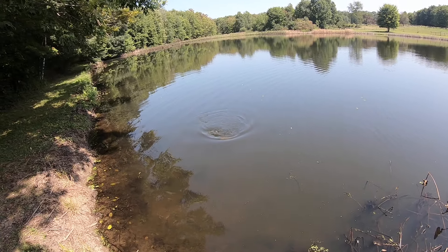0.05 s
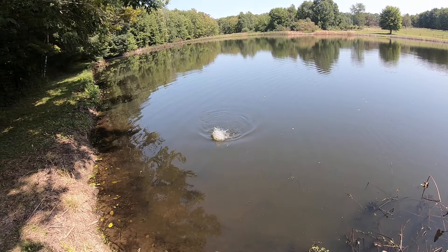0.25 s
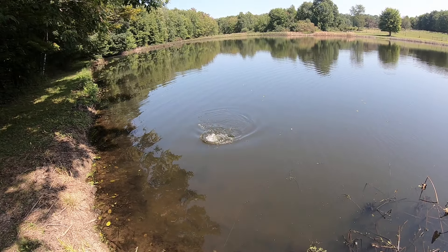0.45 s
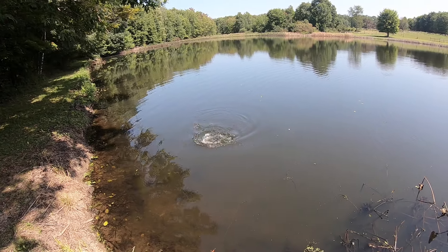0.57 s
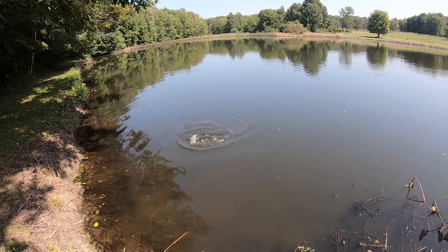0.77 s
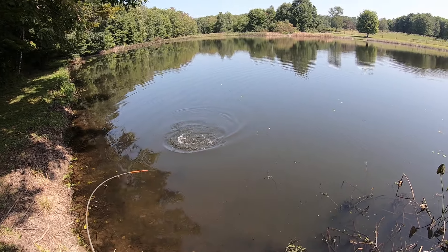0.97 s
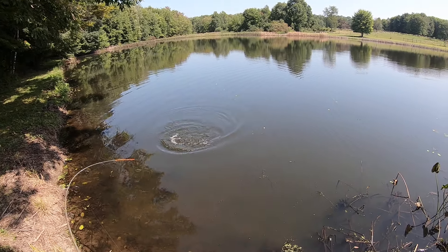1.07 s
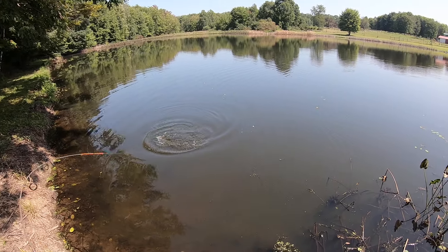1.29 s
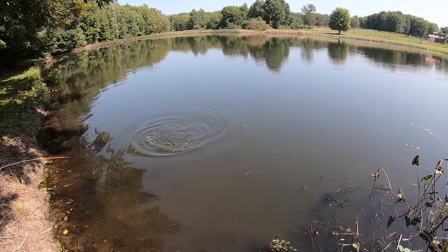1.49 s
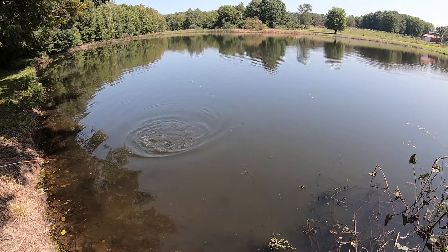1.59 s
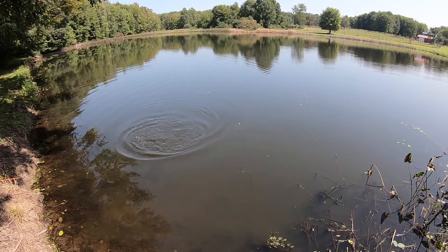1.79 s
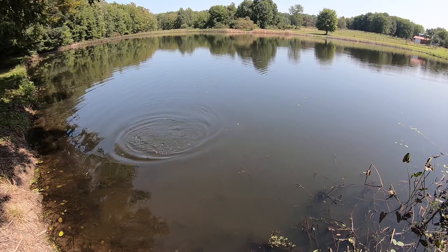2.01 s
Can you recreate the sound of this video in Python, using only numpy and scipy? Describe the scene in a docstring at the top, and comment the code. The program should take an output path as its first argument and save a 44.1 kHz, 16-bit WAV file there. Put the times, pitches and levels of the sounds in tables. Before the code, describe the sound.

A small gulping fish splash on calm water, followed by a thin, high insect buzz.

```python
"""Fish swirl on a calm pond.

A tail slap throws spray, trapped air rings in deep gulps, then drops and bubbles fall back.
A meadow katydid on the right scrapes its wings: ticks, then a buzz. A fishing reel whirrs briefly
and the tackle knocks twice. Far insects, light wind and a low outdoor hum lie under it, nearly mono."""
import sys
import numpy as np
from scipy import signal
from scipy.fft import rfft, irfft, next_fast_len
from scipy.io import wavfile
from scipy.ndimage import map_coordinates

SR = 44100
rng = np.random.default_rng(int(sys.argv[2]) if len(sys.argv) > 2 else 0)


def digitize_waveform(pressure):
    """Quantize a signal to 16-bit integers and store it at the path in sys.argv[1].

    Rows of a 2-D input are taken as channels; values are limited to [-1, 1].
    """
    field = np.atleast_2d(pressure).T
    bounded = np.clip(field, -1, 1)
    quanta = np.round(bounded * 32767).astype(np.int16)
    wavfile.write(sys.argv[1], SR, quanta)


N = 90404


def amp(db):
    """Decibels to gain."""
    return 10 ** (np.asarray(db) / 20)


def unit(x):
    """Scale to rms 1."""
    return x / np.sqrt(np.mean(x ** 2) + 1e-20)


def clock():
    """Sample times in seconds."""
    return np.arange(N) / SR


def level(rows):
    """Gain per sample from (s, dB) points."""
    return amp(np.interp(clock(), *np.transpose(rows)))


def bump(centre_s, width_s):
    """Gaussian envelope, peak 1."""
    return np.exp(-((clock() - centre_s) / width_s) ** 2)


def wobble(rate_hz):
    """Smooth random curve, rate_hz knots a second."""
    return map_coordinates(rng.standard_normal(size=4096), [clock() * rate_hz], mode="wrap")


def noise():
    """White noise."""
    return rng.standard_normal(N)


def filtered(x, response):
    """Apply a gain given as a function of Hz."""
    size = next_fast_len(N + 8192)
    return irfft(rfft(x, size) * response(np.fft.rfftfreq(size, 1 / SR)), size)[..., :N]


def coloured(x, points):
    """Shape x by (Hz, dB) points, then scale to rms 1."""
    knots_hz, db = np.transpose(points)
    return unit(filtered(x, lambda hz: amp(np.interp(np.log(hz + 1), np.log(knots_hz), db))))


def whistle(hz, wander_hz, rate_hz):
    """Tone of unsteady pitch, rms 1."""
    return unit(np.sin(2 * np.pi * np.cumsum(hz + wander_hz * wobble(rate_hz)) / SR))


def bubble(start_s, hz, swell_s, decay_s, glide_oct_per_s):
    """An air pocket swells and rings down; its pitch glides for the first 30 ms."""
    t = np.clip(clock() - start_s, 0, .15)
    swell = np.sin(np.pi / 2 * np.minimum(t / swell_s, 1)) ** 2
    decay = np.exp(-np.maximum(t - swell_s, 0) / decay_s)
    pitch_hz = hz * 2 ** (glide_oct_per_s * np.minimum(t, .03)) * (t > 0)
    return swell * decay * np.sin(2 * np.pi * np.cumsum(pitch_hz) / SR)


def swarm(low_hz, high_hz, decay_cycles, spread_db, count, ring_samples):
    """Small rising bubbles of random time, pitch and strength, rms 1."""
    when, pitch, strength = rng.random((count, 3)).T[:, :, None]
    hz = low_hz * (high_hz / low_hz) ** pitch
    cycles = hz * np.arange(ring_samples) / SR
    envelopes = amp(spread_db * strength ** 3) * hz * np.exp(-cycles / decay_cycles)
    rings = envelopes * np.sin(2 * np.pi * cycles * (1 + 0.011 * cycles / decay_cycles))
    at = (when * N).astype(int) + np.arange(ring_samples)
    return unit(np.bincount(at.ravel(), rings.ravel(), N)[:N])


def outdoors(air_db=-70, chorus_db=-73):
    """Low hum of open air, rumble of light wind and a steady chorus of far insects."""
    # Each row: frequency in Hz, relative level in dB.
    air_colour = [(25, -14), (90, -6), (120, -18.5), (160, 2.5), (195, -2), (260, -9), (400, -13),
                  (550, -18), (760, -7.5), (950, -18), (1400, -17.5), (2000, -32), (2800, -45), (5000, -55)]
    breeze_colour = [(15, -3.5), (40, 1.5), (80, 0), (120, -7.5), (300, -41.5)]
    chorus_colour = [(1500, -52), (2900, -41), (3700, -10.5), (4250, 5), (4550, 0), (4900, -7), (5600, -7),
                     (6600, -16), (8300, -16.5), (10000, -39), (13000, -22), (15500, -37.5)]
    # Each row: time in seconds, level in dB.
    gusts = [(0, -77), (.055, -64), (.09, -66), (.32, -80.5), (.39, -67), (.5, -65), (.7, -65.5), (.8, -75),
             (1.45, -79), (1.53, -67.5), (1.62, -75), (2.05, -72)]
    air = coloured(noise(), air_colour) * amp(air_db + 1.5 * wobble(9.08))
    breeze = level(gusts) * coloured(noise(), breeze_colour)
    chorus = coloured(noise(), chorus_colour) * amp(chorus_db + 1.24 * wobble(60))
    return air + breeze + chorus


def rustle(flutter_db=1.5):
    """Handling the rod makes a fluttering noise."""
    # Each row: time in seconds, level in dB.
    envelope = [(0, -68.5), (.04, -68.5), (.08, -74.5), (1.89, -90), (1.93, -78), (1.95, -68.5),
                (1.985, -60.5), (2.05, -62)]
    # Each row: frequency in Hz, relative level in dB.
    colour = [(80, -6), (200, 17.5), (500, 7), (900, -0.5), (1500, 7), (2400, -1), (3400, -16), (5200, -8),
              (8000, -40), (12000, -56)]
    return level(envelope) * coloured(noise(), colour) * amp(flutter_db * wobble(63))


def plinks(swell_s=0.0021):
    """Single bubbles and drops ring briefly."""
    # Each row: start in seconds, pitch in Hz, peak in dB, decay in seconds, glide in octaves a second.
    bubbles = [(.054, 830, -56, 0.011, -4), (.093, 690, -55, 0.0087, 12), (0.194, 2170, -52.5, 0.0019, -3),
               (0.2294, 1480, -42.5, 0.0075, -11.5), (.246, 834, -38, 0.0024, 1.5),
               (.267, 1126, -43.5, 0.018, -6), (.21, 1256, -50, .004, -6),
               (0.2851, 1130, -41.5, 0.0021, 5.5), (0.581, 1226, -50, 0.0076, -10.5),
               (.308, 1130, -43, 0.0014, 22), (0.426, 2930, -56, 0.0045, 20),
               (0.532, 1356, -50.5, 0.0071, 12), (0.592, 1223, -46.5, 0.0028, 11),
               (0.649, 320, -50.5, 0.013, 1), (0.684, 334, -50.5, 0.011, 13), (.659, 2005, -53, 0.0022, 11),
               (0.721, 2420, -52.5, 0.0027, 5), (0.815, 418, -50.5, 0.013, 2), (0.842, 445, -51, 0.01, 7),
               (0.848, 2920, -56.5, 0.0013, 13), (0.89, 1126, -47, 0.0071, 15.5)]
    return sum(amp(db) * bubble(s, hz, swell_s, decay_s, glide) for s, hz, db, decay_s, glide in bubbles)


def katydid(buzz_start_s=.748, buzz_db=-55, leaves_db=-12, leaves_t60_s=0.13):
    """File teeth scrape the wing: ticks, then a swelling train of strokes; leaves scatter it in stereo."""
    # Each row: start in seconds, level in dB before panning.
    wing_ticks = [(0.056, -73), (.112, -71), (0.164, -66.5), (0.5, -72.5), (0.5713, -66.5), (0.62, -65),
                  (0.683, -64)]
    # Each row: frequency in Hz, relative level in dB.
    wing_colour = [(7000, -30.5), (10800, -28), (11300, -25.5), (11700, -11), (12300, -3.5), (12780, -9),
                   (13250, -6.5), (13800, -11), (14300, -16.5), (15700, -29)]
    rise_s, hold_s, decay_s = 0.0011, 0.0064, 0.0028
    period_s, slowing_s, width_s = .0158, .000011, 0.0039
    soft_start_db, swell_s = 20, 0.1
    t = clock()
    ticks = sum(amp(db) * np.clip((t - s) / rise_s, 0, 1)
                * np.exp(-np.maximum(t - s - hold_s, 0) / decay_s) for s, db in wing_ticks)
    stroke = np.arange(38)
    beats_s = buzz_start_s + period_s * stroke + slowing_s * stroke ** 2
    strokes = sum(amp(rng.normal(0, 0.36)) * np.exp(-np.abs((t - s) / width_s) ** 1.73) for s in beats_s)
    effort = amp(buzz_db - soft_start_db * np.exp(-np.maximum(t - buzz_start_s, 0) / swell_s))
    rasp = coloured(noise(), wing_colour)
    ring = whistle(hz=12220, wander_hz=285.4, rate_hz=590)
    song = ticks * rasp + effort * strokes * unit(ring + amp(0.5) * rasp)
    tails = rng.standard_normal((2, SR // 4)) * amp(-60 * t[:SR // 4] / leaves_t60_s)
    scatter = signal.fftconvolve(song[None], tails / np.linalg.norm(tails[0]), axes=1)[:, :N]
    return song + amp(leaves_db) * scatter


def spray():
    """Spray lands on the surface: tiny bubbles and hiss."""
    # Each row: time in seconds, level in dB.
    envelope = [(.18, -100), (.197, -56.5), (.214, -56.5), (.224, -63), (.233, -53), (.25, -55), (.27, -59),
                (.4, -61), (.47, -63), (.495, -59), (.6, -61.5), (.65, -65.5), (.8, -63.5), (.95, -70),
                (1.2, -79.5), (1.5, -94)]
    # Each row: frequency in Hz, relative level in dB.
    colour = [(300, -13), (700, 2), (1250, 8.5), (1650, 2), (2200, 2), (3200, 0.5), (4200, 4.5), (5200, -7),
              (6200, -4), (7200, -17.5), (9000, -15), (11000, -57), (15000, -28)]
    bubbles = swarm(714, 11070, decay_cycles=10.5, spread_db=16.5, count=8000, ring_samples=500)
    return level(envelope) * coloured(bubbles + amp(1) * noise(), colour)


def spatter():
    """Thrown water comes down in clusters of tiny sharp impacts."""
    # Each row: centre in seconds, width in seconds, level in dB.
    clusters = [(.213, 0.0042, -54.5), (0.519, 0.0013, -59), (0.538, 0.0055, -57.5), (.577, 0.0079, -58.5),
                (.636, .003, -63), (0.758, 0.0024, -58.5), (0.831, 0.0021, -61.5)]
    # Each row: frequency in Hz, relative level in dB.
    colour = [(900, -18), (1800, 1.5), (2800, -1.5), (4400, -1.5), (5200, -19), (6300, -12), (7500, -23),
              (11000, -43)]
    impacts = swarm(1500, 6000, decay_cycles=2.2, spread_db=11, count=3000, ring_samples=300)
    return sum(amp(db) * bump(s, width_s) for s, width_s, db in clusters) * coloured(impacts, colour)


def churn():
    """Churned water: low bubbles over faint noise."""
    # Each row: time in seconds, level in dB.
    envelope = [(.22, -106), (.25, -48), (.28, -51), (.315, -46), (.355, -51), (.42, -56), (.5, -64),
                (.62, -62), (.68, -61.5), (.76, -61.5), (.84, -63), (.95, -75), (1.25, -75), (1.5, -100)]
    # Each row: frequency in Hz, relative level in dB.
    colour = [(110, -36.5), (155, -8.5), (200, 0.5), (260, -5), (340, -3), (450, -2.5), (560, -12),
              (700, -8.5), (900, -23), (1200, -22), (1700, -19.5), (4000, -52)]
    bubbles = swarm(147.1, 1713, decay_cycles=5.4, spread_db=-2.0, count=2500, ring_samples=1500)
    return level(envelope) * coloured(bubbles + amp(-17.5) * noise(), colour)


def tail_slap(start_s=0.227, release_s=0.294, rise_s=0.012, decay_s=0.022, level_db=-52):
    """The tail slaps and pushes water aside in a dense burst of bubbles."""
    # Each row: frequency in Hz, relative level in dB.
    colour = [(300, -5), (480, 1), (680, 10.5), (900, -9.5), (1100, -2), (1300, 11), (1500, -22),
              (1750, -28), (4000, -37)]
    t = clock()
    push = np.clip((t - start_s) / rise_s, 0, 1) ** .5 * np.exp(-np.maximum(t - release_s, 0) / decay_s)
    bubbles = swarm(388, 1770, decay_cycles=4.8, spread_db=1, count=3500, ring_samples=800)
    return amp(level_db) * push * coloured(bubbles, colour)


def gulps(glide_oct_per_s=5.9):
    """Air pockets close under the fish and ring with rising pitch."""
    # Each row: start in seconds, pitch in Hz, peak in dB, swell and decay in seconds.
    pockets = [(0.245, 379, -26.5, 0.004, 0.0031), (0.262, 447, -43, 0.005, 0.0027),
               (0.269, 386, -35, 0.0064, 0.0051), (.2858, 668, -37, 0.0025, 0.0065),
               (.293, 728, -47, 0.0076, 0.010), (.288, 347, -36, 0.007, 0.0041),
               (0.3073, 405, -23, 0.0074, 0.0025), (0.319, 382, -42, 0.0025, 0.0029),
               (.333, 343, -37, 0.0064, 0.0033)]
    return sum(amp(db) * bubble(s, hz, swell_s, decay_s, glide_oct_per_s)
               for s, hz, db, swell_s, decay_s in pockets)


def foam(level_db=-62):
    """Foam fizzes after the gulps."""
    # Each row: frequency in Hz, relative level in dB.
    colour = [(1300, -32), (1750, 2), (2000, 5), (2250, 3.5), (2600, -25.5), (4000, -36)]
    bubbles = swarm(1700, 2400, decay_cycles=4.6, spread_db=14, count=2000, ring_samples=700)
    return amp(level_db) * bump(centre_s=0.372, width_s=0.091) * coloured(bubbles, colour)


def banks(x, t60_s, wet_db):
    """Faint dull scatter from banks and trees."""
    t = np.arange(SR // 2) / SR
    dull_noise = signal.lfilter([1], [1, -.7], rng.standard_normal(len(t)))
    tail = dull_noise * amp(-60 * t / t60_s) * (t > .008)
    return amp(wet_db) * signal.fftconvolve(x, tail / np.linalg.norm(tail))[:N]


def reel(click_hz=2500, click_width_s=.0004, snap_s=1.3775, snap_decay_s=.0015, snap_db=-55, hum_db=-70):
    """The turning reel rubs, hums, clicks at a rate set by its speed and snaps once."""
    # Each row: time in seconds, rubbing level in dB, clicking level in dB.
    turning = [(.7, -110, -110), (.82, -72, -83), (.9, -72, -79.5), (1.04, -70.5, -77.5),
               (1.14, -74.5, -74.5), (1.2, -75, -88), (1.25, -65.5, -77), (1.31, -65, -75.5),
               (1.39, -65, -77), (1.44, -68.5, -78), (1.55, -100, -100)]
    # Each row: time in seconds, clicks a second.
    speed = [(.8, 118), (1.03, 118), (1.14, 103), (1.2, 68), (1.27, 105), (1.42, 98), (1.5, 49)]
    # Each row: frequency in Hz, relative level in dB.
    rub_colour = [(100, -6.5), (180, 5), (300, -3.5), (700, 4), (1000, -8.5), (1400, 2), (1700, -2),
                  (2150, 6), (3200, -12.5), (4200, 1), (5200, 2), (6000, -4.5), (7300, -18.5), (9200, -8),
                  (11000, -31.5), (15000, -22)]
    snap_colour = [(2000, -22), (3800, 6), (4500, 6), (6000, -27), (12000, -58)]
    t = clock()
    knots_s, rub_db, click_db = np.transpose(turning)
    rub = amp(np.interp(t, knots_s, rub_db)) * coloured(noise(), rub_colour)
    rate_hz = np.interp(t, *np.transpose(speed))
    from_click_s = (np.cumsum(rate_hz) / SR % 1 - .5) / rate_hz
    pawl = np.exp(-np.abs(from_click_s) / click_width_s) * np.sin(2 * np.pi * click_hz * from_click_s)
    clicks = amp(np.interp(t, knots_s, click_db) + 3.0 * wobble(90)) * unit(pawl)
    snap_envelope = (t > snap_s) * np.exp(-np.abs(t - snap_s) / snap_decay_s)
    snap = amp(snap_db) * snap_envelope * coloured(noise(), snap_colour)
    hum = amp(hum_db) * bump(centre_s=1.166, width_s=0.13) * whistle(hz=176, wander_hz=33.7, rate_hz=110)
    return rub + hum + clicks + snap


def spool(pulse_hz=54, width_s=0.0041, jitter_s=0.0021):
    """The spool squeaks in short, uneven pulses."""
    # Each row: time in seconds, level in dB.
    envelope = [(.82, -110), (.88, -65), (.96, -81), (1.0, -68), (1.06, -60.5), (1.11, -99), (1.16, -68),
                (1.205, -74), (1.245, -57.5), (1.335, -63.5), (1.39, -84), (1.5, -100)]
    from_pulse_s = ((clock() + jitter_s * wobble(25)) * pulse_hz % 1 - .5) / pulse_hz
    pulses = np.exp(-(from_pulse_s / width_s) ** 2)
    return level(envelope) * pulses * whistle(hz=5080, wander_hz=111, rate_hz=900)


def tackle(crack_db=-6, crack_decay_s=0.0047, thud_hz=240, thud_decay_s=0.0033):
    """Two dull knocks on the rod: ringing modes, a noise crack and a thud."""
    # Each row: start in seconds, gain of ring and crack in dB, gain of thud in dB.
    knocks = [(1.917, -54.5, -77), (1.9557, -52.5, -59)]
    # Each row: frequency in Hz, relative level in dB, T60 in seconds.
    modes = [(214, 0, 0.058), (396, 2.5, 0.029), (626, -3, 0.1), (840, -10.5, 0.048), (1330, -1, 0.023),
             (2350, -3, 0.0085)]
    # Each row: frequency in Hz, relative level in dB.
    crack_colour = [(200, 29), (700, 33), (1400, -3), (2500, -16), (3500, -19), (6000, -30), (12000, -47)]
    out = np.zeros(N)
    for start_s, db, thud_db in knocks:
        t = np.maximum(clock() - start_s, 0)
        ring = sum(amp(mode_db + rng.normal(0, 0.71) - 60 * t / t60_s) * np.sin(2 * np.pi * hz * t)
                   * (-1) ** k for k, (hz, mode_db, t60_s) in enumerate(modes))
        crack = amp(crack_db) * (t > 0) * np.exp(-t / crack_decay_s) * coloured(noise(), crack_colour)
        thud = np.exp(-t / thud_decay_s) * np.sin(2 * np.pi * thud_hz * t)
        out += amp(db) * (ring + crack) + amp(thud_db) * thud
    return out


def scene(katydid_pan_db=4.5, hiss_db=-86):
    """All central except the katydid, a trace of hiss and a faint sideways scatter of the splash."""
    # Each row: frequency in Hz, relative level in dB.
    hiss_colour = [(40, 0), (200, 2), (2500, -18), (4500, -17), (9000, -6.5), (15000, 7.5)]
    water = plinks() + gulps() + tail_slap() + churn() + spray() + foam() + spatter()
    centre = water + banks(water, t60_s=0.25, wet_db=-15)
    centre += reel() + spool() + rustle() + tackle() + outdoors()
    side = amp(hiss_db) * coloured(noise(), hiss_colour) + banks(water, t60_s=.15, wet_db=-81)
    ear = np.array([[-1], [1]])  # left, right
    return centre + ear * side + amp(ear * katydid_pan_db) * katydid()


def record(dry):
    """Brick-wall low-pass."""
    return filtered(dry, lambda hz: hz < 15800)


dry = scene()
out = record(dry)
digitize_waveform(out)
```